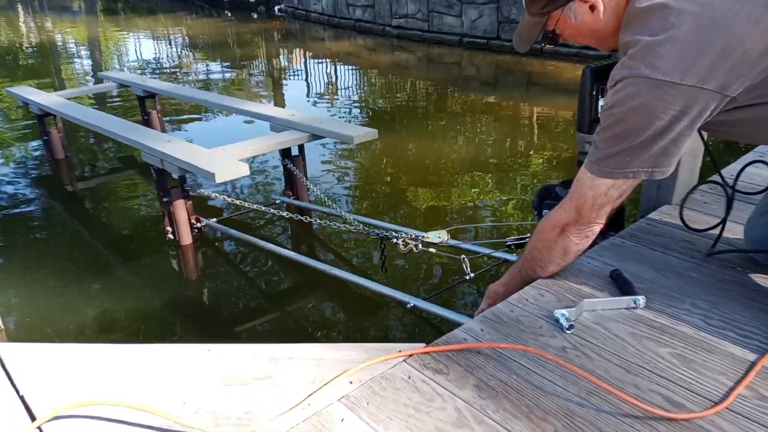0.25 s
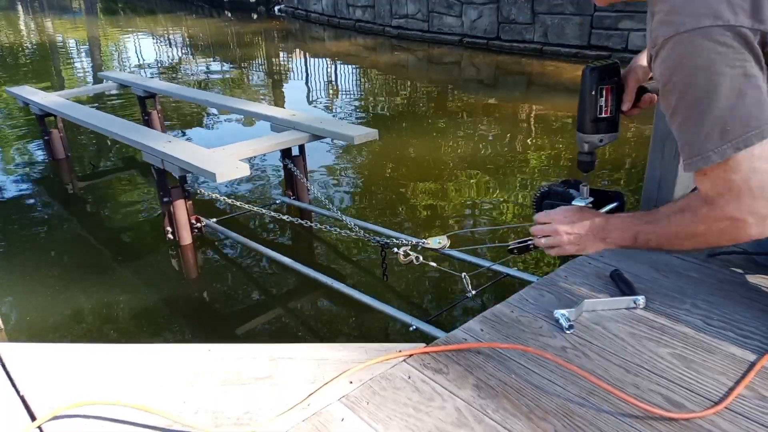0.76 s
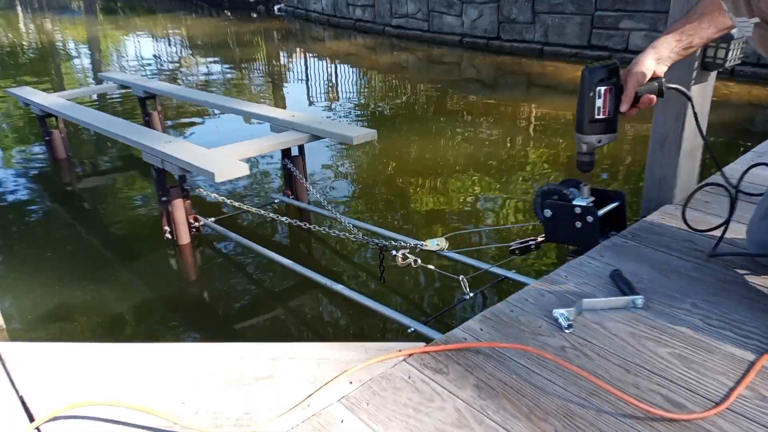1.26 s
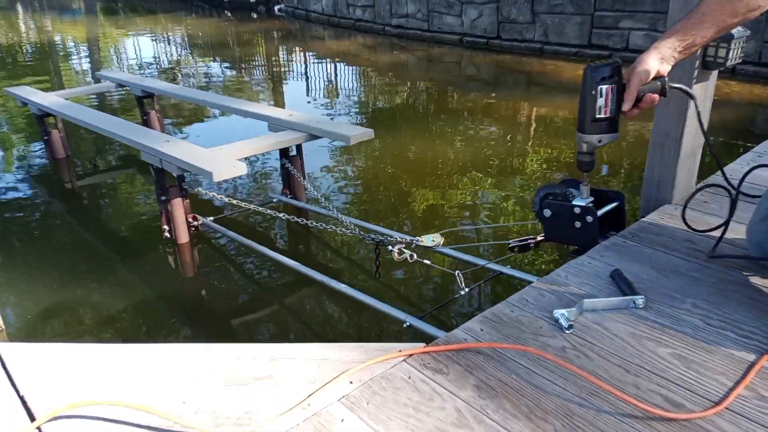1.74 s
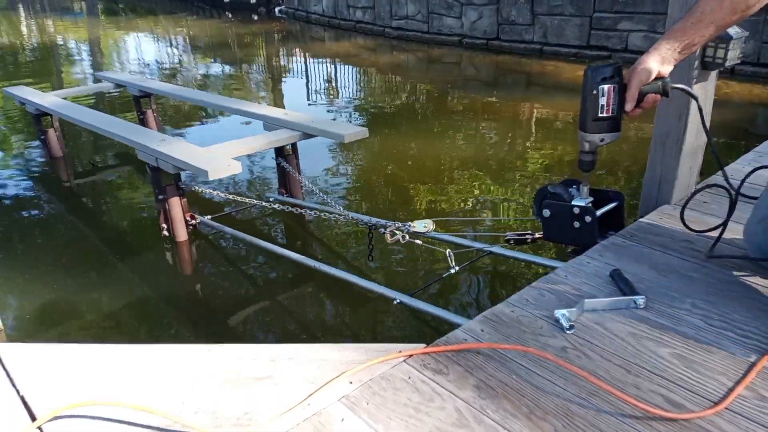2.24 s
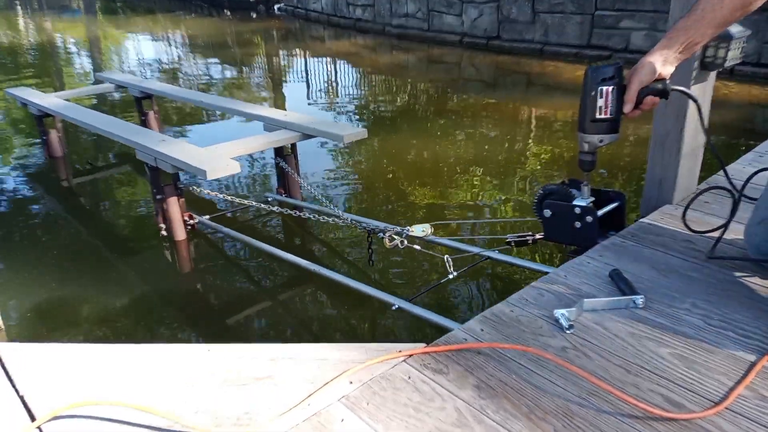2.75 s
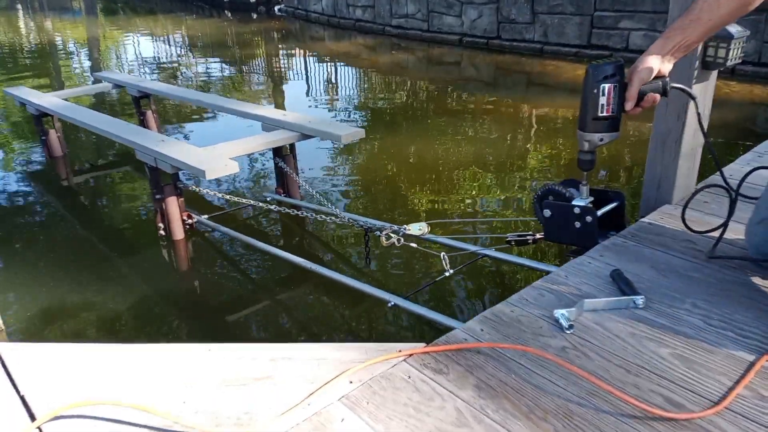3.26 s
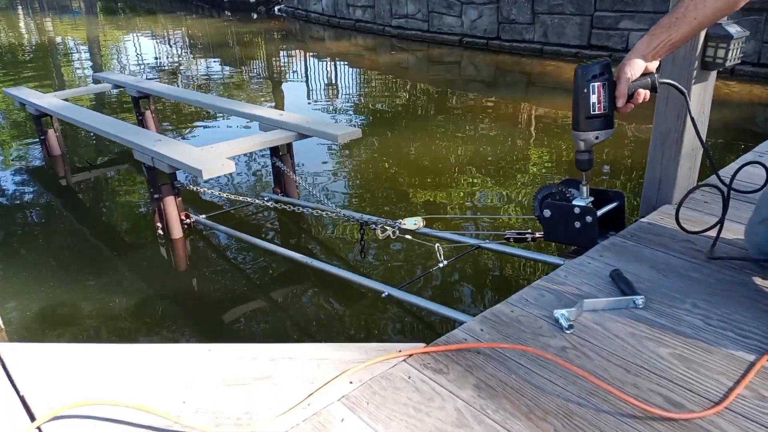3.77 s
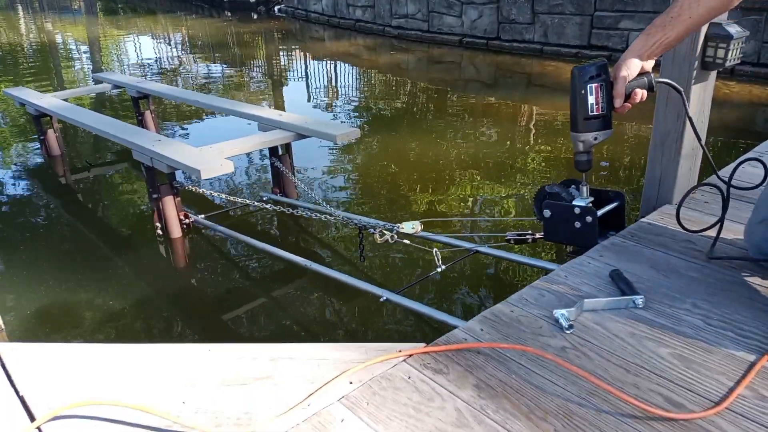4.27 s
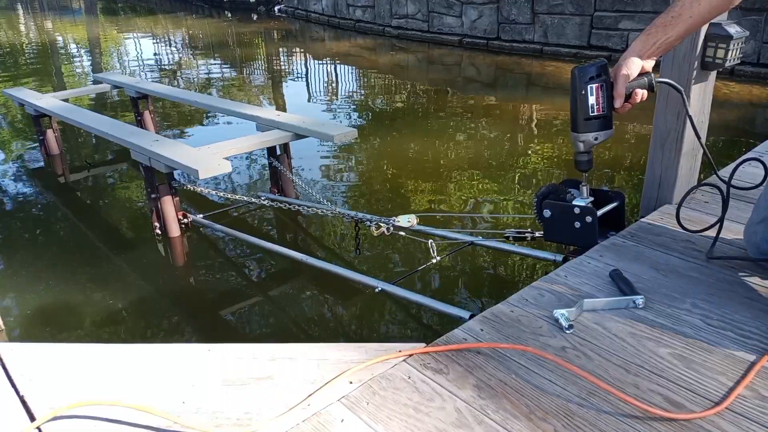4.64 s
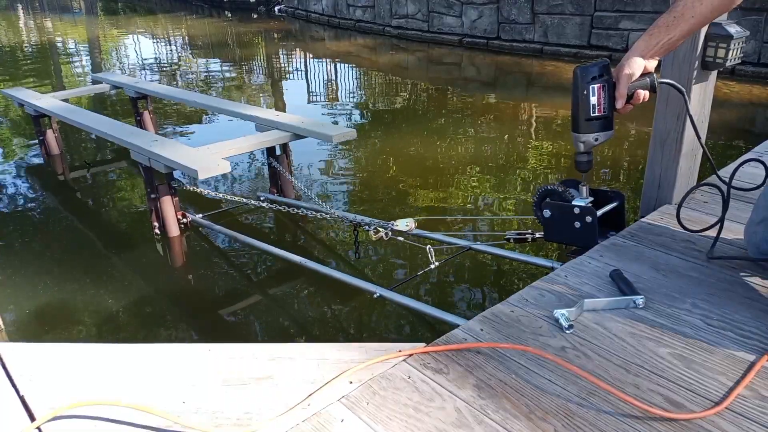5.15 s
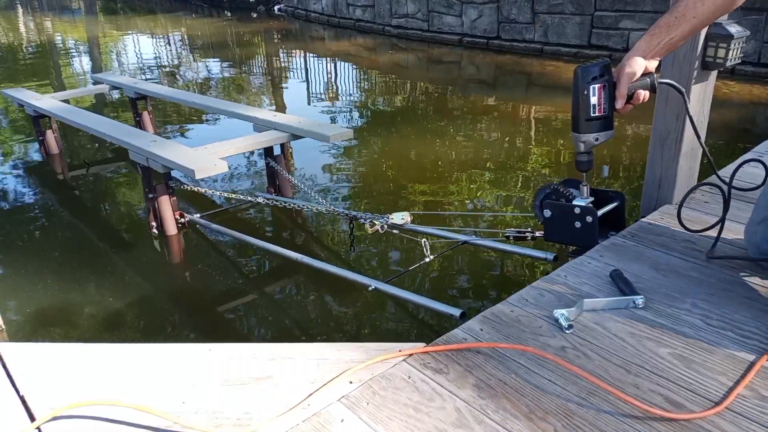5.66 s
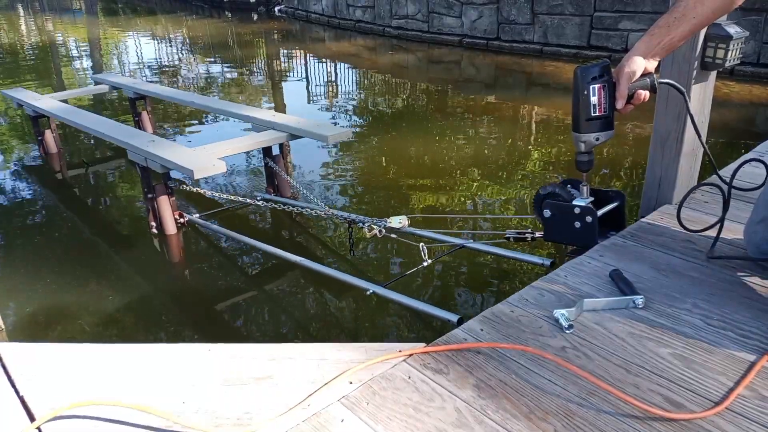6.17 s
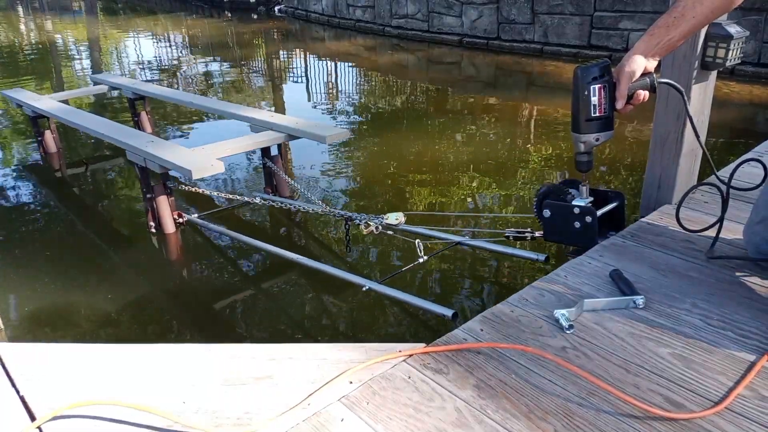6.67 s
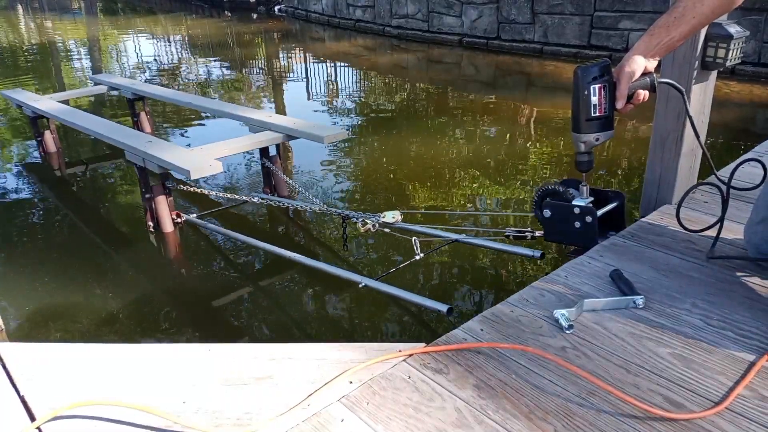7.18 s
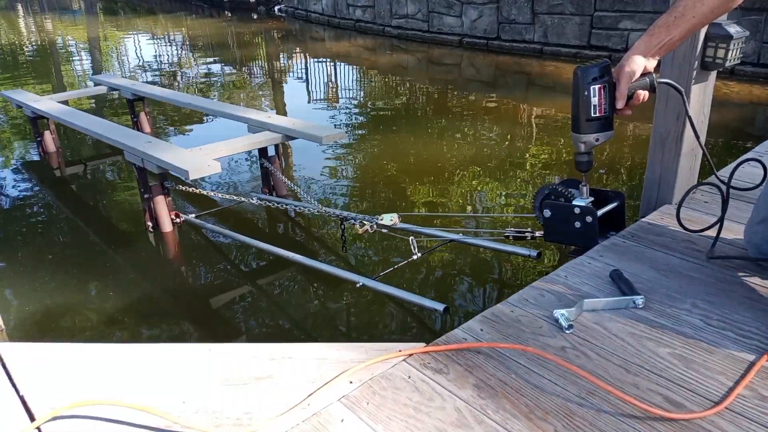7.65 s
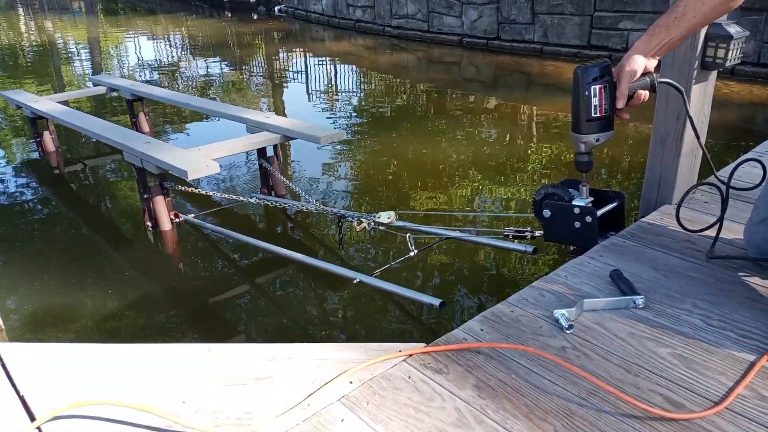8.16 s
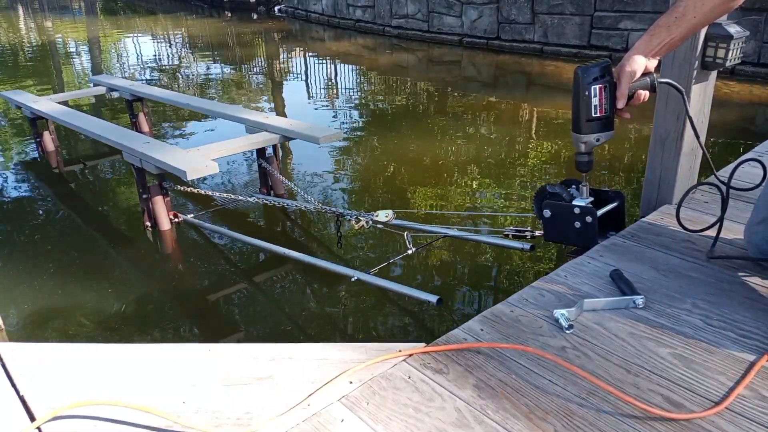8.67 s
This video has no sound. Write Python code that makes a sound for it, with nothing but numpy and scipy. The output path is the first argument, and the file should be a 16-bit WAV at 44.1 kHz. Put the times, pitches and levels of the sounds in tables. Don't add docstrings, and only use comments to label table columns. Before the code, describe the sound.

Close on a wooden lakeside dock, a corded drill turns a small winch. A high, thin whine rides over bright rushing air and gritty gear hiss, with a pulsing low rumble while hauling. After about three seconds it speeds up slightly and runs lighter and smoother. A small knock comes late, then the trigger is released, another knock sounds and the pitch slides down. Faint pump hum and water wash lie beneath, in stereo.

```python
import sys
import numpy as np
from scipy import signal
from scipy.fft import rfft, irfft, next_fast_len
from scipy.io import wavfile
from scipy.ndimage import uniform_filter1d

SR = 44100
rng = np.random.default_rng(int(sys.argv[2]) if len(sys.argv) > 2 else 0)


def bounce(signal):
    frames = np.transpose(np.atleast_2d(signal))
    limited = np.clip(frames, -1, 1)
    pcm = np.round(limited * 32767).astype(np.int16)
    wavfile.write(sys.argv[1], SR, pcm)


def ratio_of_db(decibels):
    return 10 ** (np.asarray(decibels, float) / 20)


N = 393362

BLADES = 15
REDUCTION = 289.1
LAG_S = 1.5e-4
RELEASE_S, DRAG_S, FRICTION_HZ = 7.56, 1.7, 1280
POWER_FADE_S, GAINING_HZ_PER_S = 0.25, 310
BEDDED_S, BEDDING_S = 1.7, 0.5

# (time [s], blade whine [Hz], whine level [dB])
POWERED = [(0.36, 5470, -57), (0.55, 5446, -42), (0.9, 5456, -43), (1.25, 5580, -39), (1.55, 5660, -38),
           (1.8, 5673, -38), (2.8, 5536, -40.5), (3.02, 5558, -40), (3.45, 5803, -35), (3.75, 5880, -35),
           (4.05, 5903, -36), (4.3, 5906, -36), (4.5, 5893, -36), (5.05, 5909, -37), (5.7, 5879, -38),
           (6.2, 5899, -38), (6.75, 5880, -38), (7.555, 5852, -39)]
# (multiple of armature speed, loaded [dB], light [dB], early coast [dB], late coast [dB], blur [Hz])
ARMATURE_TONES = [(1, -72, -69, -80, -90, 2), (7, -76, -76, -65, -75, 5), (14, -64, -53, -74, -76, 5),
                  (30, -57, -57, -85, -90, 4)]
# (time [s], load [0-1])
LOAD = [(0, 1), (1.5, 0.83), (2.5, 1), (3.12, 0.95), (3.36, 0.14), (5.4, 0.05), (6.1, 0.15), (6.9, 0.15),
        (7.6, 0.27), (7.9, 0.06)]
# (frequency [Hz], width [Hz], level [dB])
DECK = [(176, 14, -8.5), (247, 40, -0.5), (335.6, 53, -5), (467, 124, -11.5), (580, 93, -5),
        (624.5, 97, -6), (665.5, 113, -4.5), (811, 147, -7), (950, 200, -7.5)]
# (frequency [Hz], width [Hz], level [dB])
BOOM = [(45, 34, -25), (78, 11, -19), (103.5, 30, 20)]
# (frequency [Hz], likeness [0-1])
SAME = [(60, 0.91), (400, 0.84), (800, 0.5), (1500, 1), (2400, 0.9), (3000, 0.8), (3700, 0.4), (4300, 0.9),
        (6500, 0.25), (10000, 0.3), (16000, 0.35)]
# (time [s], frequency [Hz], level [dB])
PUMP = [(0, 129.5, -49.5), (1.4, 129.4, -58), (4.4, 129.6, -56), (5.8, 129.8, -60.5), (6.6, 131, -70),
        (7.4, 130, -51), (7.8, 128.3, -56), (8.92, 128.4, -54.5)]
# (time [s], peak [dB])
KNOCKS = [
    (6.064, -34),
    (7.608, -31),
    (8.3, -36),
]
# (frequency [Hz], level per Hz [dB])
LAKE = [(25, -31), (45, 7), (150, -18), (300, 10), (700, -46), (1500, -37), (3000, -53)]
# (multiple of chuck speed, loaded [dB], light [dB], added before the cable settles [dB])
CHUCK_TONES = [(2, -69, -72, 0), (3, -66, -74, 7), (4, -50, -70, -6), (5, -49.5, -60, -2), (6, -62, -78, 7),
               (8, -60, -74, -2), (9, -52, -72, 4), (10, -51, -69, -14), (11, -55, -73, 1),
               (12, -47.5, -61, -1), (13, -50, -60, 2), (14, -57, -76, 2), (16, -52, -76, -4),
               (17, -53, -74, -9), (18, -52, -80, -11), (20, -57, -85, -5)]
# (frequency [Hz], level [dB])
LEFT_PORT = [(700, -15.5), (2000, -13.5), (3450, -12), (3900, -7), (4900, -7), (5500, 1), (6250, -3),
             (7050, 5), (8300, -6), (9200, -8.5), (10600, -24), (12200, -23), (14300, -13.5),
             (15200, -19.5)]
RIGHT_PORT = [(2100, -16.5), (3850, -16.5), (4400, -9.5), (5600, -18.5), (6900, -18.5), (8400, -4.5),
              (9600, -2.5), (10400, -1.5), (11100, -3.5), (12000, -7), (12800, -10), (14300, -18.5),
              (15600, -24)]
# (frequency [Hz], width [Hz], left [dB], right [dB])
RIDGES = [(1690, 87, 2, 5), (3057, 195, 6, 5), (3730, 81, 4, 9), (6300, 300, 0.5, 6), (6820, 220, 2.5, -1),
          (8780, 560, 2, -3.5), (9330, 250, -2, 3), (9900, 200, 5, 1), (10420, 400, -2, 3),
          (11100, 500, 2, -0.5), (12050, 150, -6, -1), (13600, 300, -9, 2), (15500, 350, 4, 4)]
# (frequency [Hz], level [dB])
HOUSING = [(3060, -72), (3680, -51), (3950, -61), (4350, -55), (4900, -63), (5300, -56), (5520, -38),
           (5850, -39)]
# (time [s], share hidden [0-1])
HIDDEN = [
    (0.42, 1),
    (0.8, 0.32),
    (1.7, 0.33),
]
# (running light [dB], added hidden [dB], added loaded [dB], added gaining speed [dB],
# added unpowered [dB], change per octave of speed [dB])
AIR = (-33.2, -6, 1.5, -0.5, -2.5, 9.5)
TOP = (-36, -5.5, 1, -.5, -3, 9.5)
GRIND = (-44, -5, 3.5, -1.5, -0.5, 9.5)
LOW_GRIND = (-50.5, -1.5, 5, 0, 0.5, 11.5)
RUMBLE = (-52, 0, 14.5, 0.5, 1, 5)
THUD = (-59.5, 3, 9, -2, 13, 12.5)


def evened(x):
    return x / np.sqrt(np.mean(x ** 2) + 1e-20)


def read(points, hz):
    f, value = np.transpose(points)
    return np.interp(np.log(hz + 1), np.log(f + 1), value)


def curves(rows, t):
    s, *columns = np.transpose(rows)
    return [np.interp(t, s, c) for c in columns]


def resonate(x, hz, width):
    pole = np.exp((-np.pi * width + 2j * np.pi * hz) / SR)
    once = signal.lfilter([1 - abs(pole)], [1, -pole], x)
    return 2 * signal.lfilter([1 - abs(pole)], [1, -pole], once).real


def ring_all(x, modes):
    return evened(sum(ratio_of_db(db) * resonate(x, hz, width) / np.sqrt(width) for hz, width, db in modes))


def wander(hz):
    knots = rng.standard_normal(int(N / SR * 400) + 2)
    smooth = signal.lfilter([1], [1, -np.exp(-2 * np.pi * hz / 400)], knots)
    return evened(np.interp(np.arange(N) * 400 / SR, np.arange(len(knots)), smooth))


def ports(x, other):
    size = next_fast_len(N)
    hz = np.fft.rfftfreq(size, 1 / SR)
    same = np.clip(read(SAME, hz), 0, 1)
    a, b = rfft(x, size), rfft(other, size)
    mixed = same * a + np.sqrt(1 - same ** 2) * b
    right = mixed * np.exp(-2j * np.pi * hz * LAG_S)
    return np.array([x, irfft(right, size)[:N]])


def armature(t):
    driven = curves(POWERED, t)[0]
    slowing = np.exp(-np.maximum(t - RELEASE_S, 0) / DRAG_S)
    blade_hz = (driven + FRICTION_HZ) * slowing - FRICTION_HZ
    return uniform_filter1d(blade_hz, size=700, mode="nearest")


def states(blade_hz, load, t):
    hidden = np.clip(curves(HIDDEN, t)[0], 0, 1)
    hz_per_s = uniform_filter1d(np.gradient(blade_hz) * SR, size=9000)
    gaining = np.clip(hz_per_s / GAINING_HZ_PER_S, 0, 1)
    unpowered = 1 - np.exp(-np.maximum(t - RELEASE_S, 0) / POWER_FADE_S)
    octaves = np.log2(blade_hz / 5880)
    return np.array([np.ones(N), hidden, load, gaining, unpowered, octaves])


def whine(blade_hz, load, t):
    gaining_db = np.clip(uniform_filter1d(np.gradient(blade_hz), size=9000) * SR / 60, 0, 8)
    turns = np.cumsum(blade_hz) / BLADES / SR
    level_db = np.where(t < RELEASE_S, curves(POWERED, t)[1], read(HOUSING, blade_hz))
    lines = [(BLADES, level_db + (0.6 + 1.1 * load) * wander(40), 1.2 + 2.5 * load)]
    for k, loaded, light, release, rest, blur in ARMATURE_TONES:
        powered_db = light + (loaded - light) * load + gaining_db * (k > BLADES)
        coasting_db = np.interp(t, [7.6, 8.3, 8.7], [release - 2, release - 1, rest])
        tone_db = np.where(t < 7.6, powered_db, coasting_db)
        lines += [(k, tone_db + 2 * wander(12), blur)]
    out = np.zeros((2, N))
    for k, db, blur in lines:
        hz = round(k) * blade_hz / BLADES
        phase = 2 * np.pi * (round(k) * turns + np.cumsum(blur * wander(28)) / SR)
        tilt_db = np.clip(read(LEFT_PORT, hz) - read(RIGHT_PORT, hz), -6, 12)
        left, right = ratio_of_db(tilt_db / 2), ratio_of_db(-tilt_db / 2)
        scale = 2.5 * ratio_of_db(db) / np.maximum(left, right)
        late_phase = phase - 2 * np.pi * hz * LAG_S
        out += scale * [left * np.cos(phase), right * np.cos(late_phase)]
    return out


def raw_hiss(load):
    spark_size = ratio_of_db(2.2 * np.minimum(rng.exponential(1, N), 3.5))
    sparks = spark_size * (rng.random(N) < 900 / SR) * rng.choice([-1, 1], N)
    raw = rng.standard_normal((2, N)) + ratio_of_db(-12) * evened(sparks)
    hits = rng.exponential(1, N) * (rng.random(N) < 45 / SR)
    bursts = signal.oaconvolve(hits, np.hanning(200), "same")
    treble = signal.butter(N=3, Wn=8300, btype="high", fs=SR, output="sos")
    bright = signal.sosfilt(treble, raw)
    return raw + bright * ratio_of_db(-5) * (0.2 + load) * np.minimum(bursts, 1.8)


def hiss(throb_db, load, state):
    patchy_db, flicker_db = 0.6, 0.4
    throbbing = ports(*raw_hiss(load)) * ratio_of_db(throb_db + flicker_db * wander(33))
    hz, t, z = signal.stft(throbbing, SR, nperseg=512, noverlap=384)
    at = np.minimum(t * SR, N - 1).astype(int)
    air_db, top_db, grind_db, low_db = np.array([AIR, TOP, GRIND, LOW_GRIND]) @ state[:, at]
    grind = np.clip((5700 - hz) / 900, 0, 1)[:, None]
    top = np.clip((hz - 8300) / 1000, 0, 1)[:, None]
    low = np.clip((3300 - hz) / 900, 0, 1)[:, None]
    level_db = low * (low_db + 28.5) + (grind - low) * (grind_db + 23.5)
    level_db = level_db + top * (top_db + 16) + (1 - grind - top) * (air_db + 13)
    patches = rng.standard_normal(z.shape[:0:-1]).T
    patches = evened(uniform_filter1d(uniform_filter1d(patches, 8, 0), 20, 1))
    bass_cut_db = 14 * np.clip(np.log2(600 / (hz + 20)), 0, 4)
    colour_db = np.array([read(LEFT_PORT, hz), read(RIGHT_PORT, hz)]) - bass_cut_db
    colour_db += sum(np.outer(db, np.exp(-((hz - f) / w) ** 2)) for f, w, *db in RIDGES)
    shaped = z * ratio_of_db(colour_db[..., None] + level_db + patchy_db * patches)
    return signal.istft(shaped, SR, nperseg=512, noverlap=384)[1][:, :N]


def winch(chuck, throb_db, load, blade_hz, state):
    rumble_db, boom_db = np.array([RUMBLE, THUD]) @ state
    rumble_db = rumble_db + 0.8 * wander(5)
    boom_db = boom_db + 2 * wander(2)
    loose = np.clip((BEDDED_S - np.arange(N) / SR) / BEDDING_S, 0, 1)
    spinning = (blade_hz / 5800) ** 2 * ratio_of_db(-8 * state[4])
    tones = np.zeros(N)
    for k, loaded, light, early in CHUCK_TONES:
        tone_db = light + (loaded - light) * load + early * loose + 1.9 * wander(1.4)
        tones += ratio_of_db(tone_db) * np.cos(2 * np.pi * (round(k) * chuck + rng.random()))
    grind = rng.standard_normal((2, N)) * ratio_of_db(0.57 * throb_db + wander(38))
    case = ratio_of_db(rumble_db - 1.5) * ring_all(grind, DECK)
    boom = ratio_of_db(boom_db - 3) * ring_all(grind, BOOM)
    noise = ports(*(case + boom)) * ratio_of_db([[0.9], [-0.9]])
    return noise + np.sqrt(2) * spinning * tones * ratio_of_db([[-0.6], [0.6]])


def knocks():
    blows = np.zeros(N)
    for s, db in KNOCKS:
        blows[round(s * SR)] = ratio_of_db(db)
    ring = sum(ratio_of_db(db) * resonate(blows, f, w + 30) * SR / (w + 30) for f, w, db in DECK)
    return 0.16 * ring


def pump(t):
    hz, db = curves(PUMP, t)
    level = np.sqrt(2) * ratio_of_db(db + 0.52 * wander(2.6))
    return level * np.sin(2 * np.pi * np.cumsum(hz + 0.5 * wander(3.8)) / SR)


def lake():
    size = next_fast_len(N)
    colour = ratio_of_db(read(LAKE, np.fft.rfftfreq(size, 1 / SR)))
    wash = irfft(rfft(rng.standard_normal((2, N)), size) * colour, size)[:, :N]
    return ratio_of_db(-62) * evened(ports(*wash))


def scene():
    t = np.arange(N) / SR
    blade_hz = armature(t)
    chuck = np.cumsum(blade_hz) / REDUCTION / SR
    load = np.clip(curves(LOAD, t)[0], 0, 1)
    state = states(blade_hz, load, t)
    turn = 2 * np.pi * chuck
    pattern = np.cos(turn + 1.1) + 0.6 * np.cos(2 * turn + 2.5) + 0.6 * np.cos(3 * turn + 0.7)
    throb_db = (0.1 + load) * pattern
    brushes_db = 0.6 * np.cos(2 * np.pi * np.cumsum(blade_hz) / BLADES / SR)
    motor = whine(blade_hz, load, t) + hiss(throb_db + brushes_db, load, state)
    hauling = winch(chuck, throb_db, load, blade_hz, state) + knocks()
    return motor + hauling + pump(t) + lake()


def band_limit(x):
    return signal.sosfilt(signal.butter(12, 15820, fs=SR, output="sos"), x)


def record(dry):
    return band_limit(dry)


dry = scene()
out = record(dry)
bounce(out)
```